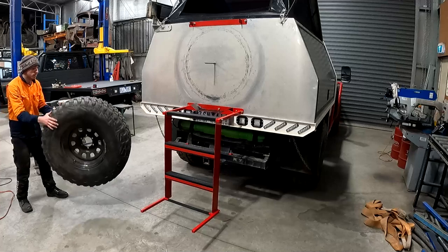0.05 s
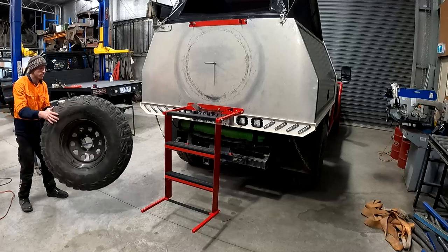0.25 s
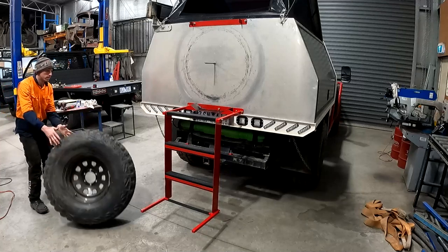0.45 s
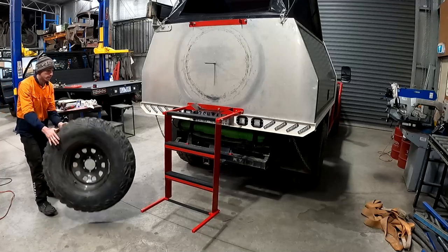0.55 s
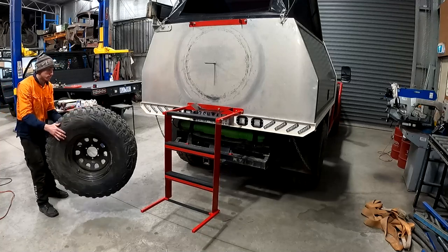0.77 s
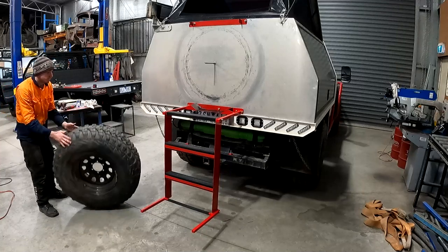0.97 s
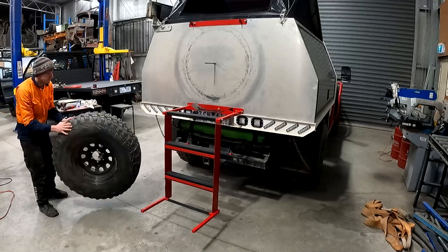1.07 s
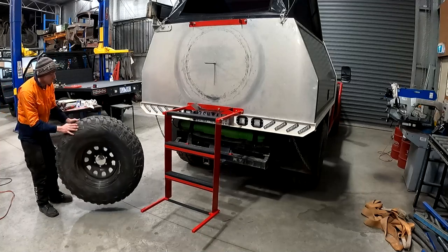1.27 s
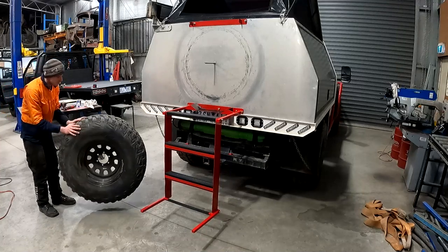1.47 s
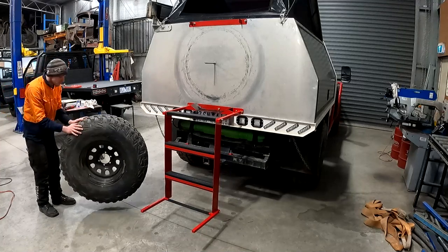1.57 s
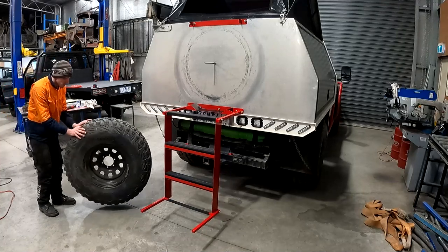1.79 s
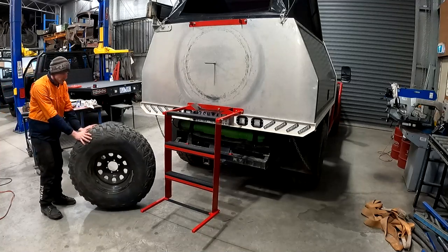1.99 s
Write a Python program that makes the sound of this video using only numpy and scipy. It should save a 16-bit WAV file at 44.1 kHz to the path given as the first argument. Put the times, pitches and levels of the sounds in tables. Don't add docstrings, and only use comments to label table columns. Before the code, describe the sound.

A heavy wheel with a thick tyre bounces five times on a concrete workshop floor, quickening

```python
import sys
import numpy as np
from scipy import signal
from scipy.fft import rfft, irfft, next_fast_len
from scipy.io import wavfile
from scipy.ndimage import uniform_filter1d

SR = 44100
rng = np.random.default_rng(int(sys.argv[2]) if len(sys.argv) > 2 else 0)


def materialize(psi):
    bounded = np.clip(np.atleast_2d(psi).T, -1, 1)
    quanta = np.round(bounded * 32767).astype(np.int16)
    wavfile.write(sys.argv[1], SR, quanta)


def elevation(decibels):
    levels = np.asarray(decibels, float)
    return 10 ** (levels / 20)


N = 89655
T = np.arange(N) / SR


def table(rows, hz):
    rows = np.array(rows)
    return np.interp(np.log(hz), np.log(rows[:, 0]), rows[:, 1])


def shape(x, gain):
    size = next_fast_len(N + SR // 4)
    hz = np.fft.rfftfreq(size, 1 / SR) + 1
    return irfft(rfft(x, size) * gain(hz), size)[..., :N]


def band(x, hz, width):
    return shape(x, lambda f: 1 / (1 + ((f - hz * hz / f) / width) ** 6))


def unit(x):
    return x / np.sqrt(np.mean(x ** 2))


def noise_band(hz, width, channels=2):
    return band(rng.standard_normal((channels, N)), hz, width)


def walk(rate):
    k = int(SR / rate)
    return unit(uniform_filter1d(uniform_filter1d(rng.standard_normal(N), k), k))


def ring(at, modes, db, scale_hz=1, loose=0):
    scatter_db, detune = 2.5, .02
    t, out = np.maximum(T - at, 0), 0
    for (mode_hz, mode_db, t60), c in zip(modes, rng.standard_normal((len(modes), 3))):
        size = elevation(db + mode_db + loose * scatter_db * c[0])
        if loose:
            size = size * np.sign(c[2])
        hz = mode_hz * scale_hz * (1 + loose * detune * c[1])
        out = out + size * np.sin(2 * np.pi * hz * t) * 1000. ** (-t / t60)
    return out


# (frequency [Hz], side level [dB])
SHED_SIDE = [(40, -37), (125, -24), (300, -16), (700, -10), (2000, -6), (10000, -7)]


def wide(mid, side):
    side = shape(side, lambda f: elevation(table(SHED_SIDE, f)))
    return np.array([mid + side, mid - side])


# (time [s], slap level [dB], slap frequency [Hz], slap length [cycles], whistle level [dB])
BOUNCES = [
    (.0132, -6.5, 1350, 2.1, -37),
    (.6083, -12, 1450, 2.0, -48),
    (1.0867, -8, 1420, 2.4, -40),
    (1.4934, -6.5, 1200, 1.5, -33),
    (1.8317, -1.5, 1500, 1.6, -29),
]


def slap():
    out = np.zeros(N)
    for at, db, hz, cycles, _ in BOUNCES:
        t = T - at
        linger = np.where(t > 0, 1.6, 1)
        out += elevation(db) * np.sin(2 * np.pi * hz * t) * np.exp(-(3 * t * hz / cycles / linger) ** 2)
    return out


# (grit tick [dB], lug knock [dB], groove ring [dB])
TICKS = [(-29.5, -19.5, -27.5), (-35, -43, -34), (-27.5, -24, -53), (-38, -19.5, -28.5), (-35, -41, -32.5)]


def contact():
    knock_hz, knock_s, tick_s = 2950, .0006, .001
    out = np.zeros(N)
    for (at, *_), (tick_db, knock_db, _) in zip(BOUNCES, TICKS):
        t = T - at
        out += elevation(knock_db) * np.sin(2 * np.pi * knock_hz * t) * np.exp(-(t / knock_s) ** 2)
        grit = unit(noise_band(4300, 5500, 1)[0])
        out += elevation(tick_db) * grit * np.exp(-(t / tick_s) ** 2)
    return out


def whistle():
    hz, rise_s, fall_s = 925, .006, .0046
    out = np.zeros(N)
    for at, *_, db in BOUNCES:
        t = T - at
        swell = np.exp(np.minimum(t, 0) / rise_s - np.maximum(t, 0) / fall_s)
        out += elevation(db) * swell * np.sin(2 * np.pi * hz * t)
    return out


# (slab level [dB], carcass level [dB], carcass frequency [Hz], carcass swell [s])
DRIVE = [(-15, -17, 89, .03), (-18, -20.5, 72, 0.0043), (-21.5, -16, 83, 0.0086), (-19, -16.5, 76, 0.0103),
         (-20.5, -19, 100, 0.042)]
# (frequency [Hz], level [dB], T60 [s])
SLAB = [(33.2, 1.5, 0.44), (45.3, -12, .8)]


def floor_slab():
    hold_s, release_s, rise_s, lag_s, after_db = 0.12, 0.023, 0.0086, .004, -20.5
    out = 0
    for (at, *_), (db, *_) in zip(BOUNCES, DRIVE):
        t = np.maximum(T - at, 0)
        heave = np.exp(-(np.maximum(t - hold_s, 0) / release_s) ** 2) + elevation(after_db)
        out = out + heave * (1 - np.exp(-t / rise_s)) * ring(at + lag_s, SLAB, db)
    return out


# (ratio to carcass frequency [1], level [dB], T60 [s])
CARCASS = [(1.002, -1.5, 0.47), (1.38, -1.5, 0.18), (1.7, -9, 0.17)]
# (frequency [Hz], level [dB], T60 [s])
BELT = [(150.4, -2.5, 0.27), (129.9, -2, 0.96)]
# (cavity [dB], sidewall [dB], shoulder [dB], belt [dB])
SKIN = [(-25, -19, -21, -20), (-17.5, -17, -25.5, -26.5), (-22, -20.5, -24.5, -22.5),
        (-30, -20.5, -25, -31), (-29.5, -24.5, -22, -36.5)]


def carcass():
    belt_swell_s = 0.02
    out = 0
    for (at, *_), (_, db, hz, swell_s), (*_, belt_db) in zip(BOUNCES, DRIVE, SKIN):
        t = np.maximum(T - at, 0)
        out = out + (1 - np.exp(-(t / swell_s) ** 2)) * ring(at, CARCASS, db, hz)
        out = out + (1 - np.exp(-(t / belt_swell_s) ** 2)) * ring(at, BELT, belt_db, loose=1)
    return out


BODY_LAG_S = .0008

# (frequency [Hz], level [dB], T60 [s])
CAVITY = [(185, 0, .42), (207, -1, .4), (198, -13, 1.3), (172, -15, 1.3)]


def air_cavity():
    out = 0
    for (at, *_), (db, *_) in zip(BOUNCES, SKIN):
        out = out - ring(at + BODY_LAG_S, CAVITY, db)
    return out


# (frequency [Hz], level [dB], T60 [s])
SIDEWALL = [(258.6, -8, 0.19), (295.4, -5.5, 0.16), (320.5, -7, 0.05), (347.7, -2, 0.076), (395, -1, 0.04)]
# (frequency [Hz], level [dB], T60 [s])
SHOULDER = [(442.9, 0, 0.075), (519, 0, 0.098), (548.6, -2.5, .12), (616, -15, 0.36), (669.4, 0, 0.041),
            (769.4, -6.5, 0.12), (900.7, -11.5, .15)]


def sidewalls():
    out = 0
    for (at, *_), (_, wall_db, shoulder_db, _) in zip(BOUNCES, SKIN):
        out = out + ring(at + BODY_LAG_S, SIDEWALL, wall_db, loose=0.78)
        out = out + ring(at + BODY_LAG_S, SHOULDER, shoulder_db, loose=1)
    return out


# (blocks [dB], edges [dB], grit [dB], dust [dB], decay factor [1])
CLATTER = [(-27.5, -38.5, -46, -58, 0.95), (-31, -49.5, -52.5, -67, 0.69), (-27, -45.5, -47.5, -60.5, 1.),
           (-31.5, -36.5, -54.5, -65.5, 0.86), (-54, -37, -59.5, -77, 1.)]
# (frequency [Hz], width [Hz])
CLATTER_HZ = [
    (1200, 977),
    (2300, 1650),
    (5100, 3700),
    (9000, 4900),
]
# (frequency [Hz], T60 [s])
SHED_T60 = [(60, 0.52), (100, 0.55), (250, 0.73), (600, .55), (1500, 0.78), (4000, 0.97), (10000, 0.63)]
SHED_BUILD_S = 0.0025


def clatter():
    bands = [*CLATTER_HZ, (1048, 300)]
    out = 0
    for (at, *_), (*levels, factor), (*_, groove_db) in zip(BOUNCES, CLATTER, TICKS):
        t = np.maximum(T - at, 0)
        build = 1 - np.exp(-t / SHED_BUILD_S)
        for db, (hz, width) in zip([*levels, groove_db], bands):
            fade = build * 1000. ** (-t / factor / table(SHED_T60, hz))
            out = out + fade * elevation(db) * unit(noise_band(hz, width))
    return wide(*out)


# (start [s], rise [s], fall [s], level [dB], frequency [Hz])
SCUFFS = [(0.331, 0.082, .25, -70, 5500), (.52, 0.035, 0.11, -65.5, 7600), (.68, 0.02, 0.086, -62, 5500),
          (.93, 0.097, 0.35, -56.5, 5740), (0.949, 0.092, 0.44, -63.5, 10500), (.95, 0.17, 0.13, -54, 3010),
          (1.09, 0.066, 0.17, -56, 5460), (1.5, 0.05, 0.42, -35.5, 1850), (1.85, 0.11, 0.2, -31.5, 1183),
          (1.86, 0.062, 0.41, -58, 5560)]


def scuffs():
    flicker_db = 1.5
    out = 0
    for at, rise, fall, db, hz in SCUFFS:
        t = T - at
        env = np.clip(t / rise, 0, 1) ** 1.5 * 1000. ** (-np.maximum(t - rise, 0) / fall / 2)
        mid, side = (unit(x) for x in noise_band(hz, hz * .6))
        out = out + elevation(db + flicker_db * walk(49)) * env * wide(mid, side)
    return out


def shed(x):
    echo = 0
    for hz in 40 * 2 ** np.arange(0, 8.6, .5):
        fade = 1000. ** (-T / table(SHED_T60, hz))
        echo = echo + fade * noise_band(hz, hz / 3)
    echo = wide(*echo) * (1 - np.exp(-T / SHED_BUILD_S)) * 0.026
    return signal.fftconvolve(echo, x[None], axes=1)[:, :N]


# (frequency [Hz], density [dB per Hz])
HUM = [(25, -9), (45, 12.5), (110, -4.5), (200, -2.5), (300, -17), (1000, -24.5), (6500, -39), (12000, -61)]
# (frequency [Hz], level [dB], width [Hz])
DRONE = [(164.4, -51, 6.3), (203.5, -60, 14)]


def hum():
    level_db, flicker_db = -42, 2
    out = 0
    for hz in 28 * 2 ** np.arange(0, 8.9, .5):
        out = out + elevation(table(HUM, hz) + flicker_db * walk(6.4)) * noise_band(hz, hz / 3)
    out = unit(out) * elevation(level_db)
    for hz, db, width in DRONE:
        out = out + elevation(db) * unit(noise_band(hz, width))
    return wide(*out)


# (frequency [Hz], left-right difference [dB])
PAN_DB = [(40, .1), (250, .9), (1000, 2), (2500, 2.7), (10000, 1.5)]


def scene():
    smack, low, cavity, skin = slap(), carcass(), air_cavity(), sidewalls()
    wet = shed(elevation(-9.5) * smack + skin + elevation(-12) * cavity + elevation(-0.5) * low)
    direct = smack + contact() + whistle() + floor_slab() + low + cavity + skin
    left, right = direct + wet + clatter() + scuffs()
    left = shape(left, lambda f: elevation(table(PAN_DB, f) / 2))
    right = shape(right, lambda f: elevation(-table(PAN_DB, f) / 2))
    return np.array([left, right]) + hum()


def roll_off(x):
    return signal.sosfilt(signal.butter(12, 16000, fs=SR, output="sos"), x)


def record(dry):
    top_hz = 14000
    mix = shape(dry, lambda f: 1 / (1 + (f / top_hz) ** 10))
    return roll_off(mix)


dry = scene()
out = record(dry)
materialize(out)
```